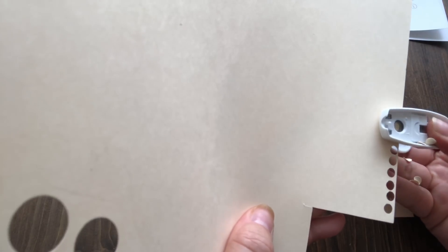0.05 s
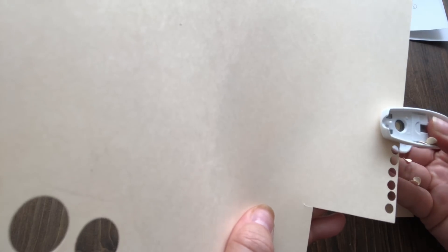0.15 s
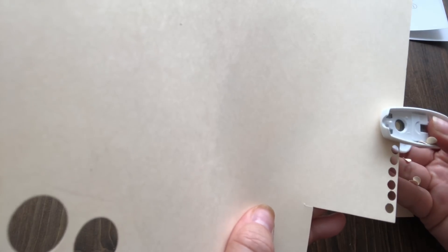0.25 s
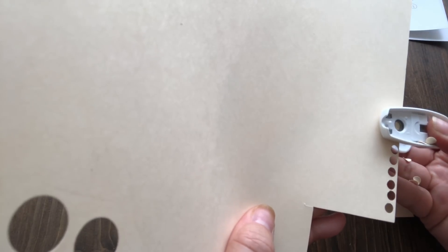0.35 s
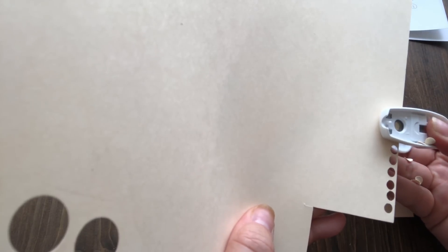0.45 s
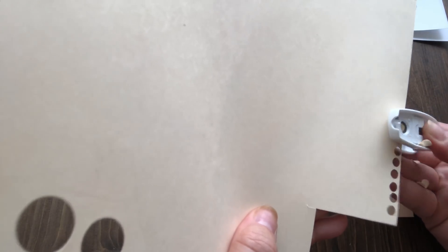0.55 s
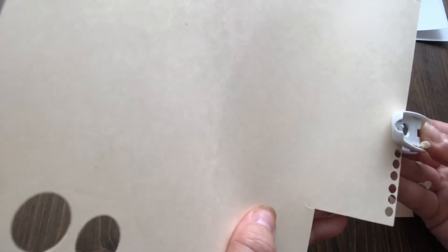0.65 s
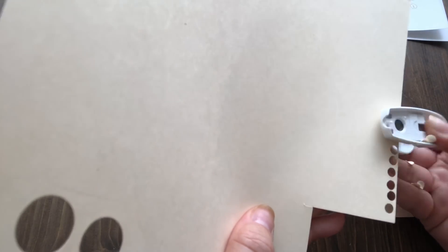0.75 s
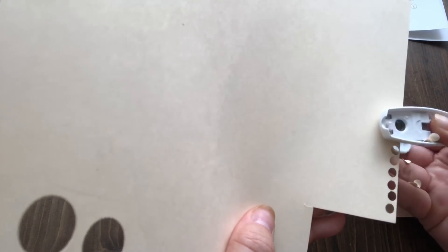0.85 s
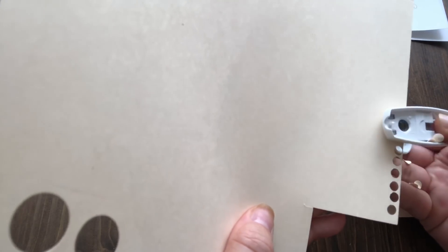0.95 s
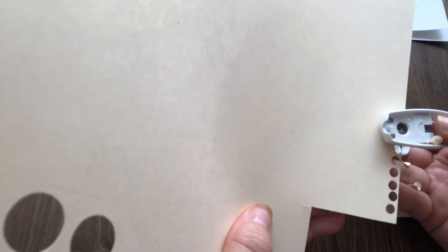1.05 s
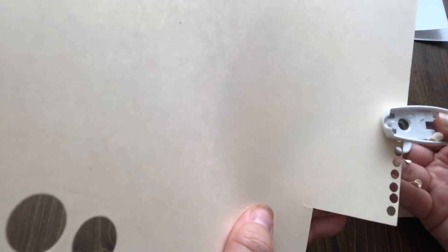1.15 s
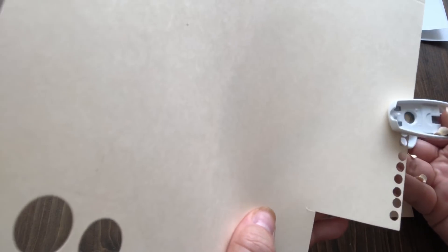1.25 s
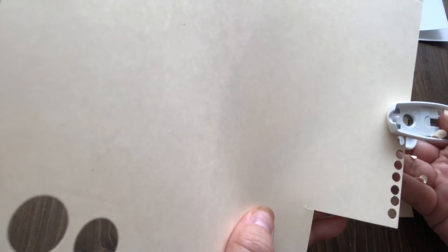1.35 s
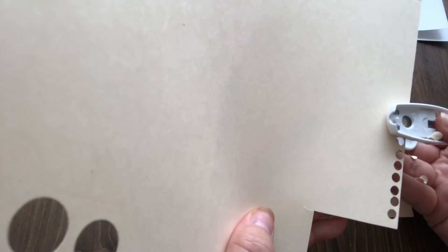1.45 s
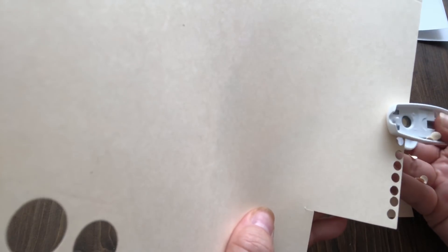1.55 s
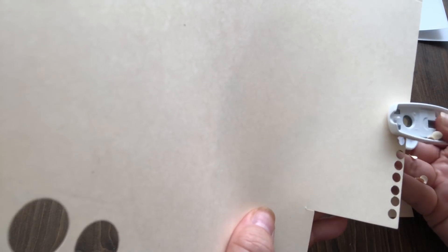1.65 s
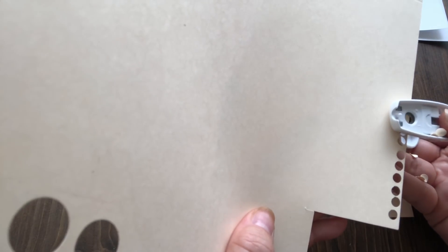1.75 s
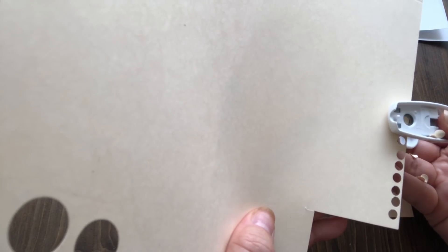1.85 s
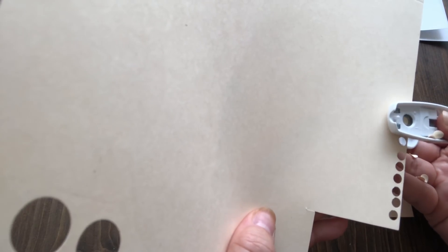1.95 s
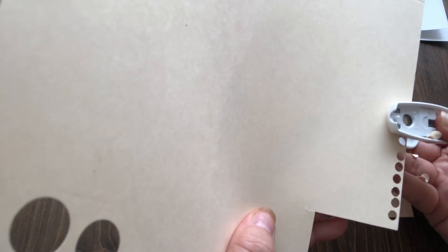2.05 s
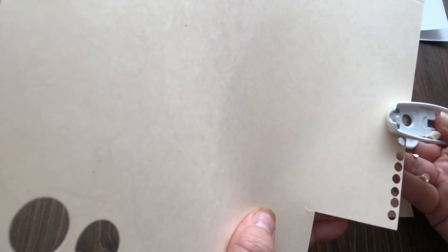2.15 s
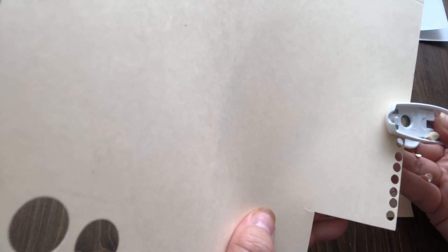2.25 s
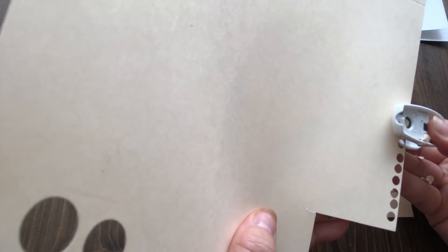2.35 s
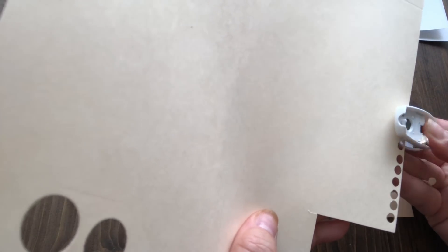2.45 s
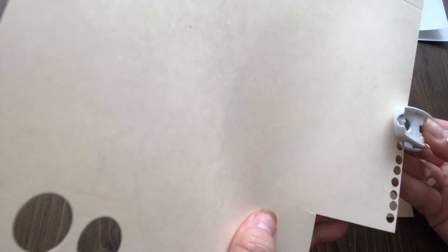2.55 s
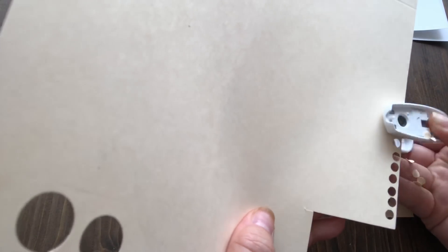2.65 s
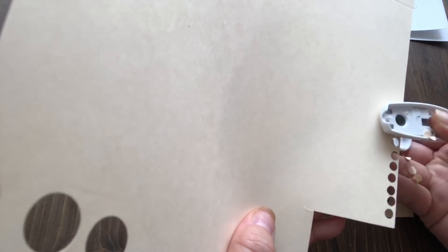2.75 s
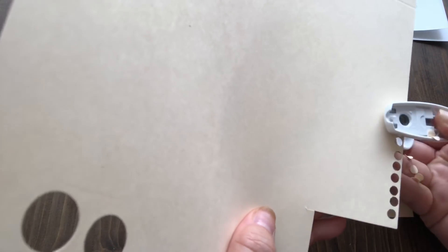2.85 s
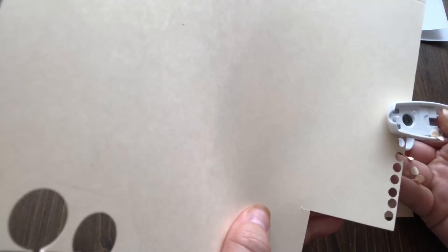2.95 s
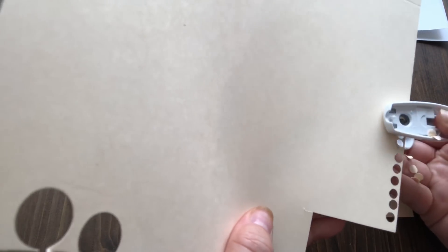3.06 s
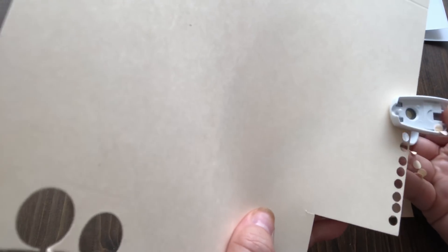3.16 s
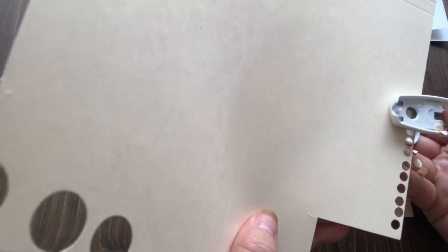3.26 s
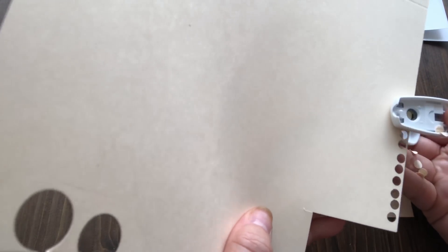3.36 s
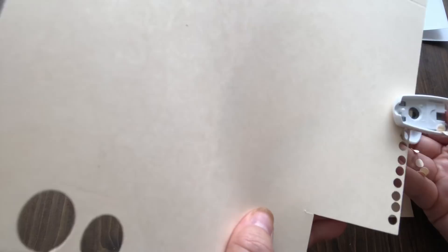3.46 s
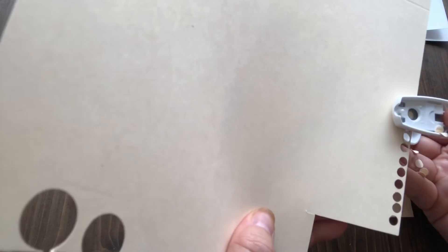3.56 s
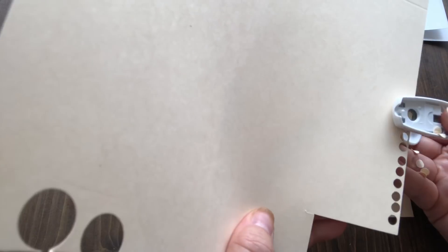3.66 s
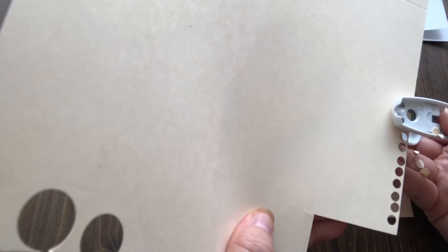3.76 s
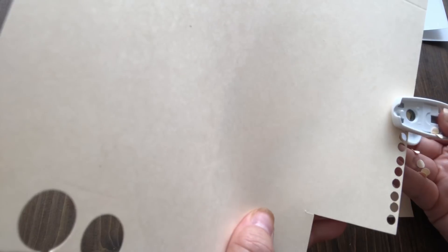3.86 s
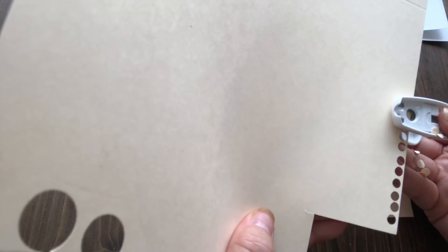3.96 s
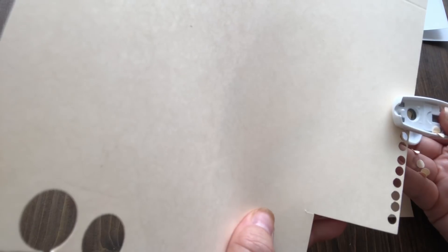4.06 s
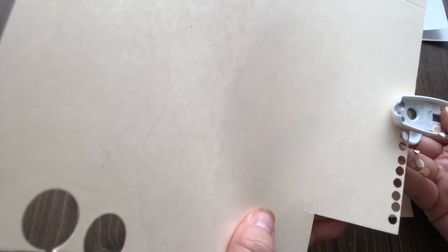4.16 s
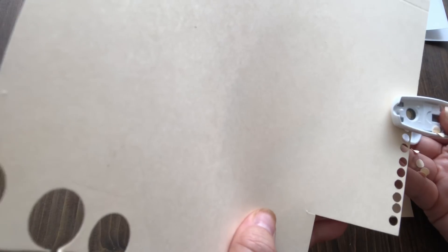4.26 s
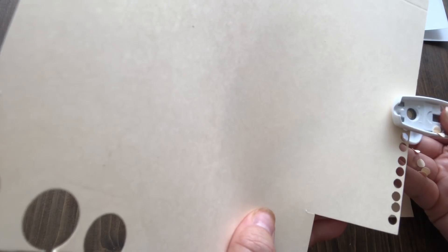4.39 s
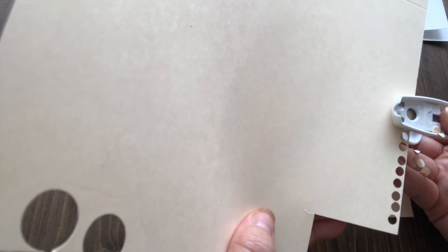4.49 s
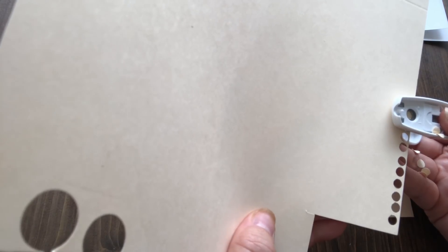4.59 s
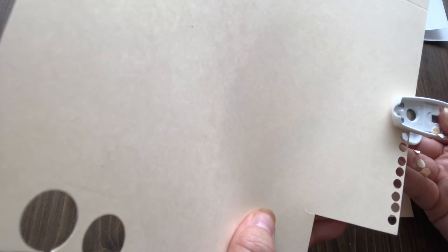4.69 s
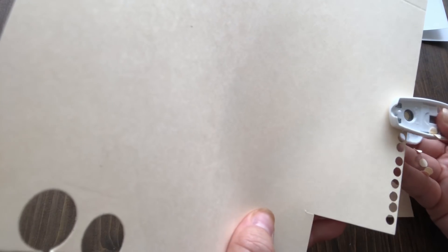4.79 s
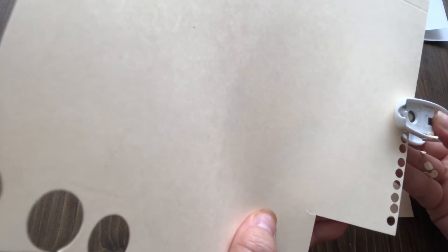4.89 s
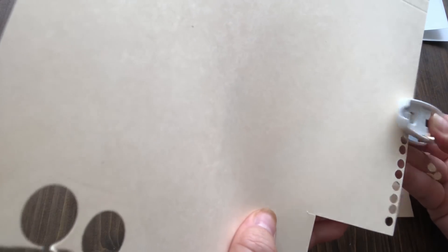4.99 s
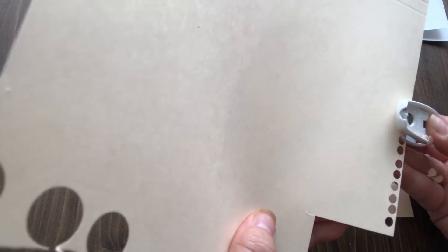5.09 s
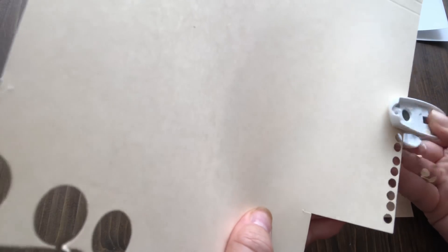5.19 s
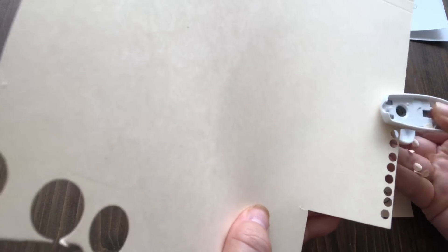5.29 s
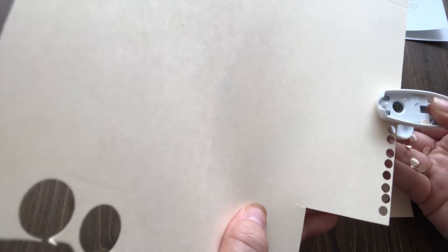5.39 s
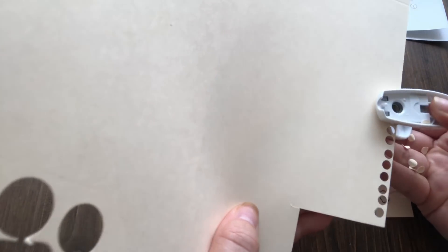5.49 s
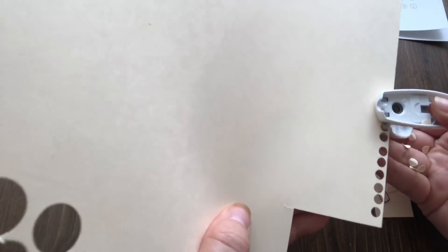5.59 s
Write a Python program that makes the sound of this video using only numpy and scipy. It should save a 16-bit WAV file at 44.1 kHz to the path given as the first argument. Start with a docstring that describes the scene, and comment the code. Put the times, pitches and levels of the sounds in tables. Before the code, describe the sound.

A quiet, low fan hum and soft air run throughout in a small room, with the punch and card close to the microphone over a desk. Card slides faintly at the start, with a barely audible high squeak at 0.1 s. At 0.6 s the pin crunches and pops through fibres, then at 0.68 s a hard, duller snap slaps the card; the lever clicks open at 0.83 s with a brief rasp. Knocks and rustling follow from 0.86 to 1.9 s. A second bite at 2.38 s leads to a brighter, ringing snap at 2.52 s and release at 2.71 s. Card taps and slides around 3.0-3.4 s; a very faint low hum swells at 3.8 s, with more sliding at 4.3-4.65 s. The third bite at 4.95 s brings a loud ringing snap at 5.1 s, a springy release at 5.28 s, then small closing knocks near 5.55 s.

```python
"""A small handheld punch makes three holes along the edge of a sheet of card, close to the microphone, over a desk.
Each squeeze crunches through the fibres (noise grains), snaps against its stop (a crack and ringing modes),
then clicks open and drags the pin out of the hole with a rasp of filtered grains.
Between holes the card slides and knocks in the slot. Two faint short tones, a high broken one and a low hum,
swell briefly as wavering sines; a small room answers, with a fan humming in it."""
import sys
import numpy as np
from scipy import signal
from scipy.fft import rfft, irfft
from scipy.io import wavfile

SR = 44100
rng = np.random.default_rng(int(sys.argv[2]) if len(sys.argv) > 2 else 0)


def persist_wave(psi):
    """Save psi, clipped to +-1, as 16-bit WAV."""
    counts = np.round(np.clip(psi, -1, 1) * 32767).astype(np.int16)
    wavfile.write(sys.argv[1], SR, np.atleast_2d(counts).T)


N = 248283  # samples in the scene
T = np.arange(SR // 2) / SR  # seconds since a blow


def undb(db):
    """Decibels to linear gain."""
    return 10 ** (np.asarray(db) / 20)


def fade(t60):
    """Exponential decay that falls 60 dB in t60 seconds."""
    return np.exp(-np.log(1000) * T / t60)


def onset(rise):
    """Gradual build-up after a blow, with time constant rise in seconds."""
    return 1 - np.exp(-T / rise)


def add(track, s, sound):
    """Mix a sound into the track at time s, dropping what runs past the end."""
    i = max(int(s * SR), 0)
    track[i:i + len(sound)] += sound[:max(len(track) - i, 0)]


def cut(x, hz, kind, order=2):
    """Butterworth low-pass or high-pass filter."""
    return signal.sosfilt(signal.butter(order, hz, kind, fs=SR, output="sos"), x)


def colour(x, points, size=4096):
    """Minimum-phase filter of unit power whose response passes through (Hz, dB) points."""
    hz, db = np.transpose(points)
    bins_hz = np.arange(size // 2 + 1) * SR / size
    gain = undb(np.interp(np.log(bins_hz + 1), np.log(hz), db))
    # folding the cepstrum puts the energy as early as possible
    cepstrum = irfft(np.log(gain))
    cepstrum[1:size // 2] *= 2
    cepstrum[size // 2 + 1:] = 0
    response = irfft(np.exp(rfft(cepstrum)))
    return signal.fftconvolve(x, response / np.linalg.norm(response))[:len(x)]


def ring(modes, scale=1):
    """Damped sines of a struck body, all pitches times scale."""
    out = np.zeros(len(T))
    for hz, db, t60 in modes:
        out += undb(db) * fade(t60) * np.sin(2 * np.pi * hz * scale * T)
    return out


def fibres(count, spread_db):
    """Dense tiny fractures of random sign and very unequal size; rms 1."""
    sign, size = rng.standard_normal((2, count))
    grains = np.sign(sign) * undb(spread_db * np.clip(size, -2.5, 2.5))
    return grains / grains.std()


def walk(count, rate):
    """Random drift in straight lines between normal draws, rate of them a second."""
    t = np.arange(count) / SR * rate
    knots = rng.standard_normal(2048)
    return np.interp(t, np.arange(len(knots)), knots)


def stroke(length, spread_db, catch_db, catch_rate, edge, ease_db):
    """Friction that swells, catches and slips, and loses ease_db from start to end (gains if negative)."""
    count = int(length * SR)
    swell = signal.windows.tukey(count, edge)
    ease = undb(ease_db * np.linspace(.5, -.5, count))
    catch = undb(catch_db * walk(count, catch_rate))
    return swell * ease * fibres(count, spread_db) * catch


def snags(length, rate, spread_db):
    """Burrs catch and let go at random moments, about rate times a second, each with a tiny tick."""
    count = int(length * SR)
    caught = rng.random(count) < rate / SR
    return caught * fibres(count, spread_db)


def contact(chatter_db, t60):
    """One hard contact, a single unit sample, with a brief noisy chatter after it."""
    push = undb(chatter_db) * fade(t60) * rng.standard_normal(len(T))
    push[0] = 1
    return push


def room(x, early_db, early_t60, late_db, late_t60, treble_t60, split_hz):
    """Quick reflections from desk and hands, then a short tail that loses its treble first; both decaying noise."""
    early, low, high = rng.standard_normal((3, len(T)))
    near = early * fade(early_t60) * (T > .002)
    dull = cut(low, split_hz, "low") * fade(late_t60)
    bright = cut(high, split_hz, "high") * fade(treble_t60)
    tail = (dull + bright) * onset(0.0035)
    response = undb(early_db) * near / np.linalg.norm(near)
    response += undb(late_db) * tail / np.linalg.norm(tail)
    return signal.fftconvolve(x, response)[:N]


# Steady tones of the fan in the room. Each row: pitch in Hz and rms level in dB, both before they waver.
FAN_TONES = [(82, -68.5), (188.4, -61.5), (253, -69), (483, -68.5), (753.7, -82), (7224, -86.5),
             (9868, -97)]
# Spectrum of the room air. Each row: frequency in Hz, relative level in dB.
AIR_SPECTRUM = [(15, -76), (25, -47.5), (53, -18.5), (70, -16), (137, -3), (212, -5.5), (249, 2),
                (335, -7.5), (405, -10.5), (560, -17.5), (677, -16.5), (1890, -29.5), (2690, -30),
                (7310, -40.5), (16000, -51.5)]
AIR_DB = -51.5


def fan():
    """A steady rush of air, as coloured noise, with a few sines wavering in pitch and level."""
    rush = rng.standard_normal(N) * undb(.5 * walk(N, 5))
    air = undb(AIR_DB) * colour(rush, AIR_SPECTRUM)
    for hz, db in FAN_TONES:
        waver_hz = min(.012 * hz, 9) * walk(N, 18)
        phase = 2 * np.pi * np.cumsum(hz + waver_hz) / SR
        air += np.sqrt(2) * undb(db + 2 * walk(N, 4.9)) * np.sin(phase)
    return air


# Modes of the desk top under the hands. Each row: pitch in Hz, relative level in dB, 60 dB decay time in seconds.
DESK_MODES = [(64.2, -4.5, 0.23), (88, -6, .25), (136, -4.5, 0.076), (161.5, -2.5, 0.2),
              (254.2, -0.5, 0.19), (488, -6.5, 0.29), (718, 1.5, .2), (950.2, -4, 0.12)]
# Spectrum of the boom from the desk. Each row: frequency in Hz, relative level in dB.
BOOM_SPECTRUM = [(30, -21), (60, 3.5), (90, -3), (170, -0.5), (260, -3), (350, -11), (700, -12.5),
                 (1500, -44)]
# Spectrum of the burst the room throws back after a snap. Each row: frequency in Hz, relative level in dB.
BURST_SPECTRUM = [(100, -11), (350, -2), (700, 3), (1250, 1.5), (1800, -0.5), (3100, 3), (3900, -1.5),
                  (4700, -3.5), (7000, -8.5), (11000, -11), (16000, -20.5)]


def aftersound():
    """Each snap jolts the desk, which booms late and low, and throws a broad, even burst into the room."""
    blows, boom, desk = np.zeros((3, N))
    for s, *_, desk_db, room_db in SNAPS:
        build = undb(desk_db) * onset(0.0045)
        add(blows, s, undb([room_db]))
        add(boom, s, build * fade(0.35) * rng.standard_normal(len(T)))
        add(desk, s, build * undb(-2.5) * ring(DESK_MODES))
    for s, *_ in BITES:  # the bite shakes it far less
        add(boom, s, undb(-41.5) * onset(0.0019) * fade(.22) * rng.standard_normal(len(T)))
    burst = room(blows, early_db=-2.0, early_t60=0.051, late_db=-6, late_t60=0.36, treble_t60=0.26, split_hz=5500)
    return colour(burst, BURST_SPECTRUM) + colour(boom, BOOM_SPECTRUM) + desk


# Faint short tones: a high broken one and a low hum that swells briefly. Each row: start in seconds,
# length in seconds, pitch in Hz and rms level in dB, the last two before they waver.
FAINT_TONES = [(0.095, 0.099, 3650, -63), (3.826, 0.194, 754, -61.5)]


def faint_tones():
    """Faint short tones: sines that swell and fade while pitch and level waver at random."""
    out = np.zeros(N)
    for s, length, hz, db in FAINT_TONES:
        count = int(length * SR)
        phase = 2 * np.pi * np.cumsum(hz * (1 + 0.021 * walk(count, 278))) / SR
        level = np.sqrt(2) * undb(db + 3.2 * walk(count, 87))
        add(out, s, level * signal.windows.tukey(count, .5) * np.sin(phase))
    return out


# Bending modes of the held card. Each row: multiple of the card's pitch, relative level in dB,
# 60 dB decay time in seconds.
CARD_MODES = [(.78, -17.5, 0.02), (1, 2, .018), (1.13, -5, .026), (1.55, -3.5, .016)]


def card(hz, rise):
    """The card flexes; its pitch depends on how it is gripped, and it takes a moment to get going."""
    return ring(CARD_MODES, hz) * onset(rise)


# Spectrum of the small ticks of edges and burrs. Each row: frequency in Hz, relative level in dB.
TICK_SPECTRUM = [(300, -18.5), (800, 9), (1700, -3.5), (2500, 3), (4500, -3), (5500, -11), (8000, -17),
                 (16000, -35.5)]


def knock(db, hz, tick_db):
    """The edge of the card ticks against the slot and the sheet answers."""
    tick = undb(tick_db + 13.0) * contact(chatter_db=-13.5, t60=0.016)
    return undb(db) * (colour(tick, TICK_SPECTRUM) + card(hz, rise=.00042))


# Spectrum of the sliding sheet. Each row: frequency in Hz, relative level in dB.
SHEET_SPECTRUM = [(200, -13), (500, -2), (800, 1.5), (1250, 0), (1700, -8), (2400, -7.5), (3500, -9.5),
                  (4500, -10.5), (5500, -18), (9000, -28), (16000, -35)]
# Spectrum of the bright rasp of a cut edge. Each row: frequency in Hz, relative level in dB.
RASP_SPECTRUM = [(500, -19.5), (1500, -5), (3000, 5), (3900, -1), (4700, -2), (6500, -10.5), (9000, -8),
                 (12500, -5.5), (16000, -21)]


def slide(length):
    """The sheet slides: a dull, uneven rustle, a thin hiss from its edge and a few burrs."""
    sheet = stroke(length, spread_db=6, catch_db=2.5, catch_rate=130, edge=0.22, ease_db=4.0)
    hiss = undb(-22) * stroke(length, spread_db=14, catch_db=5.5, catch_rate=120, edge=0.37, ease_db=0.0)
    burrs = undb(17.5) * snags(length, rate=68, spread_db=7.5)
    return colour(sheet, SHEET_SPECTRUM) + colour(hiss, RASP_SPECTRUM) + colour(burrs, TICK_SPECTRUM)


# The card is shifted along to the next hole. Each row: start in seconds, length in seconds, level in dB.
SHIFTS = [(0.0, 0.23, -61.5), (1.044, .12, -56), (1.213, .15, -57.5), (1.416, .18, -66.5),
          (1.781, 0.081, -54.5), (3.115, 0.067, -55.5), (3.25, 0.18, -59), (4.268, .084, -50),
          (4.416, 0.24, -59), (5.593, 0.056, -51)]
# soft bumps of the moving card: level relative to the shift, pitch before the grip bends it
BUMPS_PER_S, BUMP_DB, BUMP_RANGE_DB, BUMP_HZ = 26, 5, 6, 890
# the hands never hold the sheet quite still
FIDGET_DB, FIDGET_SWING_DB, FIDGET_PER_S = -71.5, 3.5, 4


def shifts():
    """The card slides and bumps along between holes, and whispers in the hands all the while."""
    fidget = undb(FIDGET_DB + FIDGET_SWING_DB * walk(N, FIDGET_PER_S))
    out = fidget * colour(fibres(N, spread_db=5.5), SHEET_SPECTRUM)
    for s, length, db in SHIFTS:
        add(out, s, undb(db) * slide(length))
        bumps = max(round(BUMPS_PER_S * length), 1)
        for place, force, grip in rng.uniform(-.5, 0.38, (bumps, 3)):
            bump_db = db + BUMP_DB + BUMP_RANGE_DB * force
            bump = knock(bump_db, BUMP_HZ * 2 ** (0.5627 * grip), tick_db=-12)
            add(out, s + (.5 + place) * length, np.cos(np.pi * place) * bump)  # strongest in mid-push
    return out


# The card knocks in the slot. Each row: start in seconds, level in dB, card pitch in Hz,
# tick relative to the card in dB before knock() lifts it by 13.
KNOCKS = [(0.8633, -29.5, 950, -17), (1.088, -50, 930, -11), (1.1107, -30, 846, -0.5),
          (1.1162, -26, 895, -11), (3.0216, -40.5, 1000, 0), (3.04, -38.5, 892, -8.5),
          (3.076, -45.5, 890, -17), (3.138, -29.5, 786, -2), (3.164, -28.5, 880, 2),
          (5.0053, -35.5, 1007, 2.5), (5.544, -40.5, 815, -3.5), (5.567, -41.5, 793, -4),
          (5.5861, -40, 810, -4)]
# After every snap the card rattles in the slot, the second bounce weaker but harder. Each row: delay in seconds,
# level in dB relative to the snap's rattle, tick relative to the card in dB before knock() lifts it by 13.
RATTLE = [(.0032, 2, -21), (.008, -10, 3.5)]
RATTLE_HZ = 1005
# after every bite the sheet flaps back once
FLAP_DELAY_S, FLAP_DB, FLAP_HZ = 0.014, -29.5, 1100


def knocks():
    """The card flaps after each bite, rattles after each snap and knocks as it is lined up."""
    out = np.zeros(N)
    for s, *_ in BITES:
        add(out, s + FLAP_DELAY_S, knock(FLAP_DB, FLAP_HZ, tick_db=-9.5))
    for s, *_, rattle_db, _, _ in SNAPS:
        for delay, db, tick_db in RATTLE:
            add(out, s + delay, knock(rattle_db + db, RATTLE_HZ, tick_db))
    for s, db, hz, tick_db in KNOCKS:
        add(out, s, knock(db, hz, tick_db))
    return out


def rasp(length, body_db):
    """The pin rubs the cut edge of the hole: a bright rasp, the duller voice of the sheet and a few burrs."""
    pin = stroke(length, spread_db=6.5, catch_db=2, catch_rate=390, edge=1.0, ease_db=2.5)
    sheet = undb(body_db) * stroke(length, spread_db=8.5, catch_db=1, catch_rate=190, edge=.55, ease_db=-1)
    burrs = undb(11.5) * snags(length, rate=240, spread_db=1.5)
    return colour(pin, RASP_SPECTRUM) + colour(sheet, SHEET_SPECTRUM) + colour(burrs, TICK_SPECTRUM)


# the lever rubs harder and harder just before it snaps shut or springs open
STRAIN_S, STRAIN_DB = .018, -52.5


def strain():
    """A short rub that builds up until the lever lets go."""
    rub = stroke(STRAIN_S, spread_db=5.5, catch_db=2, catch_rate=300, edge=.15, ease_db=-11.5)
    return undb(STRAIN_DB) * colour(rub, SHEET_SPECTRUM)


# After every release the pin drags out of the hole in weakening pulls. Each row: delay in seconds,
# length in seconds, level in dB, sheet relative to the pin in dB.
PULLS = [(.004, .05, -41.5, -2.5), (0.044, .05, -53.5, 8), (0.084, .06, -70.5, 16)]
# the pin rubs from just before each crunch until it is through
PLUNGE_LEAD_S, PLUNGE_S, PLUNGE_DB = .008, .07, -42


def rubbing():
    """Every hole rubs alike: the pin plunges in, the lever strains before it jumps, the pin drags out."""
    out = np.zeros(N)
    for s, *_ in BITES:
        add(out, s - PLUNGE_LEAD_S, undb(PLUNGE_DB) * rasp(PLUNGE_S, body_db=-1.0))
    for s, *_ in SNAPS + RELEASES:
        add(out, s - STRAIN_S, strain())
    for s, *_ in RELEASES:
        for delay, length, db, body_db in PULLS:
            add(out, s + delay, undb(db) * rasp(length, body_db))
    return out


# Modes of the punch body in the hand. Each row: pitch in Hz before the snap's ratio, relative level in dB,
# 60 dB decay time in seconds.
PUNCH_MODES = [(1460, -18.5, .014), (1926.1, -14, 0.0076), (2290, -11, 0.019), (2840, -9.5, 0.014),
               (2920, -6.5, 0.0079), (3420, -10.5, .012), (4456, -16.5, 0.014), (4574, -22.5, 0.012),
               (5760, -21, 0.011), (6800, -21, 0.016), (7300, -25, .012), (9400, -29.5, 0.0098),
               (10900, -29, 0.014), (12400, -25.5, 0.014)]


def punch_body(ratio=1):
    """The struck punch rings in its own modes, all pitches times ratio."""
    return ring(PUNCH_MODES, ratio)


# The spring throws the lever open. Each row: start in seconds, click level in dB, body ring in dB,
# rebound delay in seconds, card flex in dB.
RELEASES = [(0.8277, -16, -45.5, 0.0048, -32.5), (2.7105, -14, -31.5, .0044, -27.5),
            (5.2766, -10.5, -30, .0037, -31)]
# Spectrum of the spring's clicks. Each row: frequency in Hz, relative level in dB.
SPRING_SPECTRUM = [(200, -25), (700, -27), (1200, -0.5), (2200, -9.5), (3000, 5.5), (3800, -1), (4600, 2),
                   (6000, -7), (7800, -7), (10000, -27), (16000, -45)]
REBOUND_CLICK_DB, REBOUND_RING_DB = 3.5, 5  # relative to the first click and ring
FLEX_HZ = 1169  # pitch of the card as the pin lifts it


def releases():
    """The pin jumps back and the lever rebounds: two light, hard clicks that ring the body and lift the card."""
    clicks, bodies = np.zeros((2, N))
    for s, click_db, ring_db, rebound, flex_db in RELEASES:
        add(clicks, s, undb(click_db) * contact(chatter_db=-15.5, t60=0.012))
        add(bodies, s, undb(ring_db) * punch_body())
        again = s + rebound
        add(clicks, again, undb(click_db + REBOUND_CLICK_DB) * contact(chatter_db=-10.5, t60=0.0091))
        add(bodies, again, undb(ring_db + REBOUND_RING_DB) * punch_body())
        add(bodies, again, undb(flex_db) * card(FLEX_HZ, rise=0.0004))
    return colour(clicks, SPRING_SPECTRUM) + bodies


# The pin bites through the card. Each row: start in seconds, length in seconds, crunch level in dB,
# pop delay in seconds, pop level in dB, pop pitch in Hz.
BITES = [(0.6115, 0.011, -25.5, 0.0022, -11.5, 1304), (2.3783, 0.013, -26, 0.0033, -16.5, 1172),
         (4.95, .014, -27, 0.00344, -25, 1430)]
# Spectrum of the crunch. Each row: frequency in Hz, relative level in dB.
CRUNCH_SPECTRUM = [(200, -14), (600, -7), (1200, 1.5), (2500, -0.5), (3200, -5.5), (4900, -3.5),
                   (6300, -14.5), (9000, -13), (12500, -8.5), (16000, -20.5)]


def bites():
    """Fibres give way in a short dense crunch, during which the disc pops free."""
    crunches, pops = np.zeros((2, N))
    for s, length, crunch_db, delay, pop_db, hz in BITES:
        crunch = stroke(length, spread_db=3.0, catch_db=2.5, catch_rate=1500, edge=0.5, ease_db=6)
        add(crunches, s, undb(crunch_db) * crunch)
        add(pops, s + delay, undb(pop_db) * card(hz, rise=0.000496))
    return colour(crunches, CRUNCH_SPECTRUM) + pops


# The lever hits its stop. Each row: start in seconds, punch ring in dB, punch pitch ratio,
# crack in dB before snaps() lifts it, rebound delay in seconds, card slap in dB, card pitch in Hz,
# rattle in dB, desk in dB, room in dB.
SNAPS = [(0.6765, -19, .81, -8, 0.0023, -5, 633, -16.5, -33.5, -3),
         (2.5184, -3.5, 1.05, -6.5, .0022, -10, 1044, -36, -35.5, 0.5),
         (5.1013, 0.5, .997, -7.5, .0021, -3, 954, -29.5, -35, 1)]
# Spectrum of the crack. Each row: frequency in Hz, relative level in dB.
CRACK_SPECTRUM = [(100, -9.5), (350, -10), (700, 0), (1400, -1), (2000, 2), (3100, 2), (3950, -10.5),
                  (4600, 0), (5600, -6.5), (8000, -8.5), (12000, -12), (16000, -21)]


def snaps():
    """The freed lever slams home and rebounds once: a crack, the body rings and the card slaps."""
    cracks, bodies = np.zeros((2, N))
    for s, ring_db, ratio, crack_db, rebound, slap_db, hz, *_ in SNAPS:
        add(cracks, s, undb(crack_db + 16) * contact(chatter_db=-15, t60=0.0083))
        add(cracks, s + rebound, undb(crack_db + 4.5) * contact(chatter_db=-10.0, t60=0.0061))
        add(bodies, s, undb(ring_db) * punch_body(ratio) * onset(0.00037))
        add(bodies, s, undb(slap_db) * card(hz, rise=0.0014))
    return colour(cracks, CRACK_SPECTRUM) + bodies


def scene():
    """Punch and card near the microphone, too small to radiate bass, in the room."""
    near = shifts() + faint_tones() + knocks() + rubbing() + releases() + bites()
    near = cut(near, 450, "high")
    echo = room(near, early_db=-15, early_t60=0.03, late_db=-15.0, late_t60=0.36, treble_t60=0.22, split_hz=10000)
    background = fan() + aftersound()  # aftersound holds the room's answer to the snaps
    return (background + echo + near + cut(snaps(), 380, "high"))[None]


def record(dry):
    """The recorder drops the deepest bass, rounds the highest peaks and cuts the top above 16.2 kHz."""
    rounded = np.tanh(cut(dry, 34, "high", order=4))
    return signal.sosfilt(signal.ellip(8, .2, 70, 16200, fs=SR, output="sos"), rounded)


dry = scene()
out = record(dry)
persist_wave(out)
```